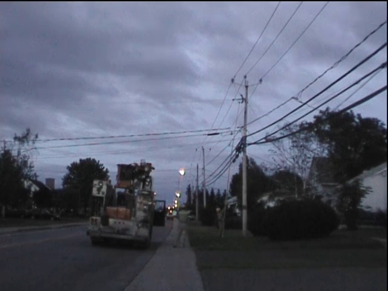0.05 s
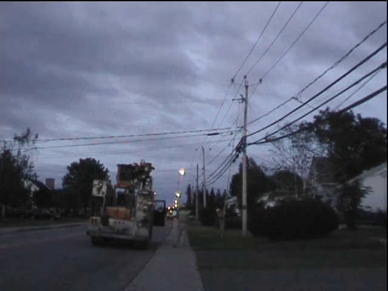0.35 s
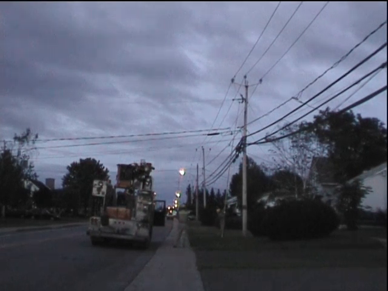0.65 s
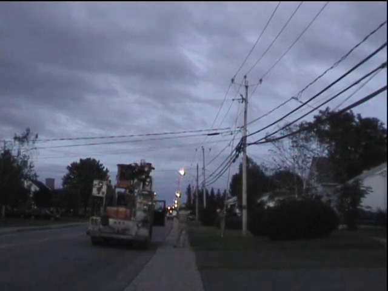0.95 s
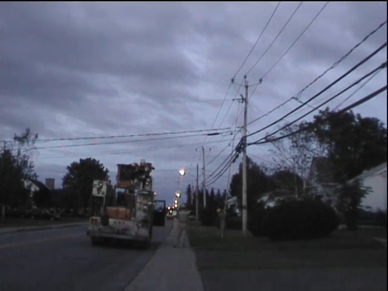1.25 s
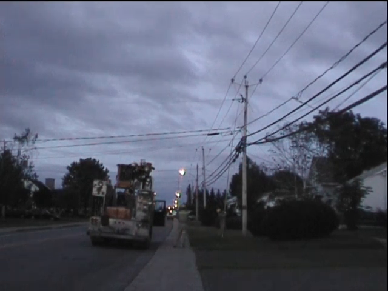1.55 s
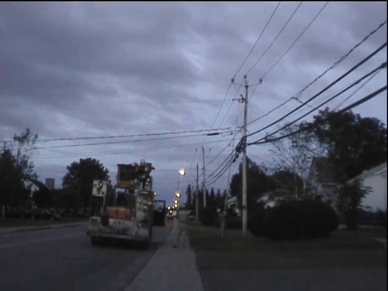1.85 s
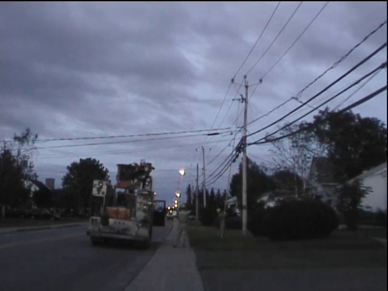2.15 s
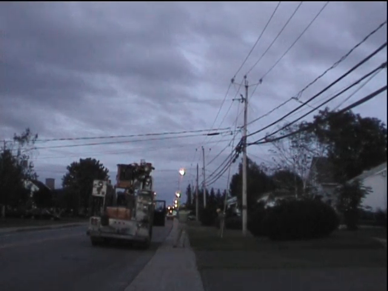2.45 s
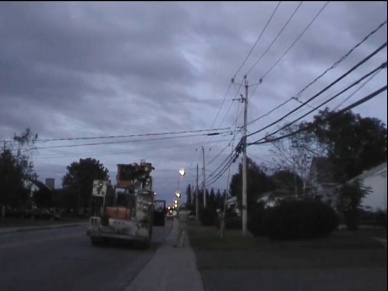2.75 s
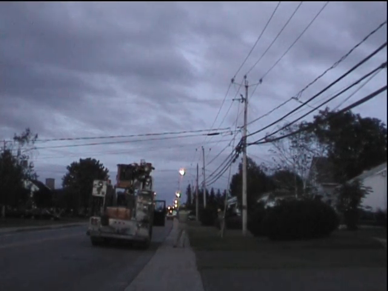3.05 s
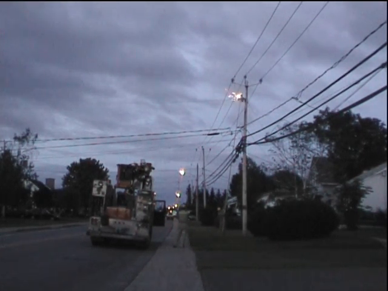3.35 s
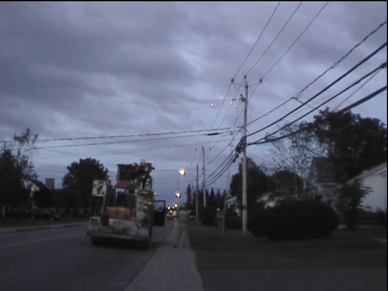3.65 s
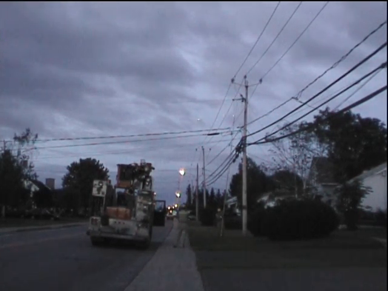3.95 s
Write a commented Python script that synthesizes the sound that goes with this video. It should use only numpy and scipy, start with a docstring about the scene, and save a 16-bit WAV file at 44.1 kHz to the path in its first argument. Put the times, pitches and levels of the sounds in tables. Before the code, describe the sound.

A short circuit on a power pole goes off with a bright crack, then a loud, distorted boom rolling off houses and trees. Before it there is only soft outdoor hush, a thin motor whine, close clicks and distant birds.

```python
"""A loud bang from a short circuit on a utility pole, beside a quiet country road at dusk.
A close, bright crack of snaps, sizzle and ringing comes at the flash. A fifth of a second later the blast
wave, a sudden push of air, overloads the microphone, slaps back from the houses and rolls away through
the trees. Before all this come a few small clicks nearby and far birds, over a thin motor whine,
a low hum and the hush of open air."""
import sys
import numpy as np
from scipy import signal
from scipy.fft import rfft, irfft
from scipy.io import wavfile

SR = 44100
rng = np.random.default_rng(int(sys.argv[2]) if len(sys.argv) > 2 else 0)


def file_out(sig):
    """Save sig as 16-bit WAV at sys.argv[1]."""
    # one column per channel
    cols = np.atleast_2d(sig).T
    # limit, then scale
    lim = np.clip(cols, -1, 1)
    pcm = np.round(lim * 32767).astype(np.int16)
    wavfile.write(sys.argv[1], SR, pcm)


N = 176400  # 4 seconds
T = np.arange(N) / SR
HZ = np.maximum(np.fft.rfftfreq(N, 1 / SR), 1)
CUTOFF_HZ = 15900  # the highest pitches fade out above this

# how alike echoing sound is in the two ears: (frequency [Hz], likeness [0 to 1])
ECHO_LIKENESS = [(150, 0.98), (380, 0.96), (950, 0.84), (6000, 0.69), (15000, 0.17)]


def blast():
    """A sharp push of air and a longer, weaker pull arrive first directly, then again as echoes."""
    # the blast wave and its echoes:
    # (time [s], strength [dB], pulse length [s], treble edge [Hz], scatter [dB], left over right [dB])
    arrivals = [(3.5184, 9.5, .0012, 1150, -7.5, 1), (3.5325, 0, .0012, 350, -14, 4),
                (3.543, 2.5, .00027, 1800, -9.5, 1), (3.5451, 4.5, .00032, 2100, -13, 1),
                (3.5984, 1, .00025, 1900, -22, -2), (3.5995, -1, .0012, 700, -17, -5),
                (3.605, -1, .0013, 400, -32, -3), (3.616, -9, .0034, 220, -44, -3),
                (3.652, -9, .002, 200, -36, 1), (3.7005, -3, .0013, 190, -39, .5),
                (3.8285, -10, .0004, 1300, -32, 0), (3.976, -14, .0006, 400, -27, -1)]
    # tone of the sound that rough walls scatter after each arrival: (frequency [Hz], level [dB])
    scatter_tone = [(150, 8.5), (430, -4), (650, -6), (900, 8), (1500, 3.5), (2200, -1), (2900, -5),
                    (4200, -16.5), (8000, -23), (15000, -46)]
    # how alike that scatter is in the two ears: (frequency [Hz], likeness [0 to 1])
    scatter_likeness = [(200, 0.98), (500, 0.8), (1000, 0.72), (6000, 0.45)]
    s = 2j * np.pi * HZ  # multiplying a spectrum by exp(-s * t) delays the sound by t seconds
    pulses, scatter = 0, 0
    for start, db, length, edge_hz, scatter_db, pan_db in arrivals:
        shock = -s / (s + 1 / length) ** 2 * SR
        u = 1j * HZ / edge_hz
        treble_loss = 1 / (1 + np.sqrt(2) * u + u * u)
        pulses += pan(pan_db) * from_db(db) * shock * treble_loss * np.exp(-s * start)
        scatter += pan(pan_db) * from_db(scatter_db) * burst(start, fade=.0035, attack=.00031)
    bounce_lag_s, bounce_db, right_lag_s = .00232, -8.5, .0001
    road_bounce = 1 + from_db(bounce_db) * np.exp(-s * bounce_lag_s)
    mic_bass_hz, mic_resonance = 86, 1.6
    u = 1j * HZ / mic_bass_hz
    microphone = u * u / (1 + u / mic_resonance + u * u)  # loses the deepest bass
    ear_delay = np.exp(-s * right_lag_s * [[0], [1]])
    bangs = irfft(pulses * road_bounce * microphone * ear_delay, N)
    return bangs + scatter * noise(scatter_tone, scatter_likeness, grain_db=3)


def close_crack():
    """A close, bright crack of snaps, sizzle and ringing comes at the flash, before the blast arrives."""
    # the crack's quick spurts:
    # (time [s], snap [dB], sizzle [dB], rise [s], fade [s], whistle [Hz], whistle [dB])
    spurts = [(3.3275, -12, -30, .0001, 0.00052, 14500, -24),
              (3.3292, -21.5, -30, 0.00017, 0.0037, 11500, -29),
              (3.3349, -36, -21, .0002, 0.0035, 5100, -18.5),
              (3.3393, -32, -11.5, 0.00072, .0036, 7000, -14)]
    # tones of the snap, the sizzle and the fading tail: (frequency [Hz], level [dB])
    snap_tone = [(100, -18), (300, -15), (600, 7.5), (1400, -11), (3000, 3), (5000, -8), (8000, -6),
                 (15000, -6.5)]
    sizzle_tone = [(500, -22), (1500, -9.5), (3000, -8), (5200, -8), (6200, -15), (9000, -13.5),
                   (11000, -15), (13000, -5.5), (15500, -31)]
    tail_tone = [(150, -7), (550, 3), (1200, 3.5), (3000, 4), (5000, 0), (6200, -5), (7000, 2), (7600, -1),
                 (12000, -7), (15500, -23)]
    # pitches at which the sizzle rings: (frequency [Hz], width [Hz], boost [dB])
    sizzle_peaks = [(3770, 180, 12), (6930, 210, 17), (7880, 180, 10), (8970, 340, 13)]
    direct_likeness = [(100, 1.0), (15000, .96)]  # almost the same in both ears
    snap = noise(snap_tone, direct_likeness, grain_db=3.5)
    sizzle = noise(sizzle_tone, direct_likeness, grain_db=3.5, peaks=sizzle_peaks)
    crack, whistle_wander_hz, tail_start_s = 0, 280, 3.341
    for start, snap_db, sizzle_db, rise, fade, hz, whistle_db in spurts:
        whistle = tone(hz + whistle_wander_hz * drift(rate_hz=489.5))
        spurt = from_db(snap_db) * snap + from_db(sizzle_db) * sizzle + from_db(whistle_db) * whistle
        crack += burst(start, fade, rise) * spurt
    short_tail = from_db(-31.5) * burst(tail_start_s, fade=.025, attack=.0032)
    long_tail = from_db(-42) * burst(tail_start_s, fade=.19, attack=.014)
    return pan(-1) * (crack + (short_tail + long_tail) * noise(tail_tone, ECHO_LIKENESS, grain_db=2))


def landscape_echoes():
    """Countless small echoes of the blast roll on over a rumble and swell where trees answer."""
    # tones of the long roll, its deep rumble and the echo off leaves: (frequency [Hz], level [dB])
    roll_tone = [(100, -29), (170, -17), (205, 6), (265, -4), (350, -5.5), (430, 2.5), (540, -5.5),
                 (700, 0.5), (900, 0), (1200, -5), (1700, -3.5), (2900, -6), (4200, -15.5), (6500, -25.5),
                 (9000, -36.5), (14000, -81)]
    rumble_tone = [(20, -30), (35, -4), (52, 9), (80, 9.5), (110, 11.5), (150, 13), (175, 5.5), (205, 5),
                   (260, -20), (600, -50), (3000, -100)]
    leaf_tone = [(300, 5), (800, 5.5), (1300, 4), (3000, 3.5), (5000, -6), (8000, -15), (12000, -28),
                 (15000, -46)]
    # soft echoes from groups of trees: (time [s], half width [s], level [dB], treble edge [Hz])
    tree_echoes = [(3.62, 0.017, -29, 4500), (3.675, 0.014, -29.5, 5000), (3.787, 0.022, -28.5, 11000),
                   (3.825, 0.044, -29.5, 5030), (3.978, 0.0085, -28.5, 1200)]
    start_s = 3.521
    roll = burst(start_s, fade=.54, attack=.00089) * noise(roll_tone, ECHO_LIKENESS, grain_db=5.5)
    rumble = burst(start_s, fade=.5, attack=.0087) * noise(rumble_tone, ECHO_LIKENESS)
    leaves = noise(leaf_tone, ECHO_LIKENESS, grain_db=6.5)
    trees = 0
    for centre, width, db, edge_hz in tree_echoes:
        swell = np.exp(-((T - centre) / width) ** 2 / 2)
        trees += dull(from_db(db) * swell * leaves, edge_hz)
    return pan(-.9) * (from_db(-24) * roll + from_db(-23) * rumble + trees)


def clicks():
    """Small, dry clicks close by, each a clack with a short ring, and one lone bright tick."""
    # the clicks: (time [s], clack [dB], ring [dB], clack fade [s], treble edge [Hz])
    touches = [(0.5252, -33.5, -44, .0042, 6000), (.5345, -45, -54, .006, 9000),
               (.632, -43, -60, .006, 2000), (.8307, -43, -54, .005, 4500), (.8385, -40, -45, .017, 3400),
               (.8672, -35, -39, .009, 7000), (3.4929, -24, -42, .0045, 5000)]
    # the notes that each click rings with: (frequency [Hz], level [dB], fade [s])
    ring_notes = [(1520, -2, .016), (2350, -5, .004), (2630, 0, .009), (3890, -1, .008), (6920, -6, .008)]
    # tones of the clack and the tick: (frequency [Hz], level [dB])
    clack_tone = [(300, -20), (900, -3), (1600, -2), (2600, 0.5), (3900, -2.5), (5200, -5), (7000, -9),
                  (15000, -21)]
    tick_tone = [(2500, -22), (5000, -5), (7000, 2), (10000, -7), (15000, -22)]
    out, clack_noise = 0, noise(clack_tone, ECHO_LIKENESS)
    for start, clack_db, ring_db, clack_fade, edge_hz in touches:
        clack = burst(start, clack_fade, attack=.00077) * clack_noise
        ring = sum(from_db(db) * burst(start, fade, attack=.00059) * np.sin(2 * np.pi * hz * (T - start))
                   for hz, db, fade in ring_notes)
        out += dull(from_db(clack_db) * clack + from_db(ring_db) * ring, edge_hz)
    tick = burst(start=2.8, fade=.0046, attack=.00055) * noise(tick_tone, ECHO_LIKENESS)
    return out + from_db(-42.5) * tick


def birds():
    """Far birds whistle notes that glide through three pitches, over faint chatter; trees blur both."""
    # the notes: (time [s], length [s], start pitch [Hz], middle pitch [Hz], end pitch [Hz], level [dB])
    notes = [(.16, .09, 4000, 3600, 3500, -58), (1.205, .06, 4600, 4450, 3800, -55.5),
             (1.23, .09, 4000, 3650, 3650, -60), (1.29, .13, 3200, 2400, 1750, -60),
             (1.585, .2, 4550, 4030, 3720, -57), (1.73, .27, 3830, 3490, 3220, -53.5),
             (1.675, .13, 2950, 2400, 2780, -54.5), (2.065, .03, 3600, 4700, 5350, -57),
             (2.098, .027, 5000, 4150, 3800, -55.5), (2.773, .08, 5680, 5520, 5370, -56.5),
             (2.878, .08, 5620, 5440, 5370, -56.5)]
    song, waver = 0, 1 + .0042 * drift(rate_hz=77)
    for start, length, start_hz, middle_hz, end_hz, db in notes:
        progress = np.clip((T - start) / length, 0, 1)
        glide = np.polyfit([0, .5, 1], [start_hz, middle_hz, end_hz], 2)
        song += from_db(db) * np.sin(np.pi * progress) * tone(np.polyval(glide, progress) * waver)
    chatter_hz = 3200 * 2 ** (.27 * drift(rate_hz=16))
    song += from_db(-66 + 3 * drift(rate_hz=16)) * tone(chatter_hz)
    reflections = rms_one(rng.standard_normal((2, N)) * burst(0, fade=.02, attack=.005))
    echo = irfft(rfft(song) * rfft(reflections) / np.sqrt(N), N)
    return song + from_db(-4) * echo


def motor_whine():
    """The strongest tones of a small motor make a thin, steady whine."""
    # the tones: (frequency [Hz], level [dB])
    whine_tones = [(1199, -72.5), (1498, -76), (2997, -70.5), (4496, -71)]
    return np.sqrt(2) * sum(from_db(db) * np.sin(2 * np.pi * hz * T) for hz, db in whine_tones)


def motor_buzz():
    """The small motor, close by, also buzzes with high overtones: multiples of its base pitch."""
    # outline of the overtones' strength: (frequency [Hz], level [dB])
    buzz_tone = [(4500, -40), (6500, -8), (8400, 14), (11500, -29), (12900, 11), (15700, -25)]
    base_hz, uneven_db = 299.7, 2.5
    overtones = np.searchsorted(HZ, np.arange(base_hz, CUTOFF_HZ, base_hz))
    unevenness, phase = rng.standard_normal((2, len(HZ)))[:, :len(overtones)]
    strength = from_db(over_hz(buzz_tone)[overtones] + uneven_db * unevenness)
    spectrum = np.zeros(len(HZ), complex)
    spectrum[overtones] = strength * np.exp(2j * np.pi * phase)
    return from_db(-70) * rms_one(irfft(spectrum, N))


def hum():
    """A low hum whose tones each waver a little in loudness and pitch."""
    # the tones: (frequency [Hz], level [dB])
    hum_tones = [(59.6, -66), (178.5, -72), (238.5, -62), (299.5, -66.5), (359.5, -69)]
    out, waver_db, wander_hz = 0, 3.5, 1.155
    for hz, db in hum_tones:
        loudness = from_db(db + waver_db * drift(rate_hz=3.7))
        out += loudness * tone(hz + wander_hz * drift(rate_hz=2.95))
    return np.sqrt(2) * out


def open_air():
    """The soft, steady hush of the outdoors, strongest in the bass."""
    # tone of the hush: (frequency [Hz], level [dB])
    air_tone = [(12, -56), (20, -20), (59, 0.5), (112, 1), (232, -3.5), (298, -8), (324, -6.5), (362, -14),
                (393, -8.5), (705, -9), (1270, -17), (3350, -14), (6190, -23), (8640, -25.5),
                (12800, -30.5), (15500, -33)]
    # how alike it is in the two ears: (frequency [Hz], likeness [0 to 1])
    air_likeness = [(60, 1), (150, 0.72), (380, 0.63), (950, 0.48), (2400, 0.8), (6000, 0.29),
                    (15000, 0.056)]
    return from_db(-48) * noise(air_tone, air_likeness)


def from_db(db):
    """Turn decibels into a number to multiply a sound by."""
    return 10 ** (np.asarray(db) / 20)


def rms_one(x):
    """Scale a signal so that its average size (root mean square) is 1."""
    return x / np.sqrt(np.mean(x ** 2) + 1e-20)


def pan(db):
    """Left and right volumes, with the left this many decibels above the right."""
    return from_db(np.array([[db], [-db]]) / 2)


def over_hz(points):
    """Join (frequency, value) points with straight lines, giving every octave the same room."""
    hz, value = np.transpose(points)
    return np.interp(np.log(HZ), np.log(hz), value)


def drift(rate_hz):
    """A smooth random wobble of about size 1; a higher rate wobbles faster."""
    return rms_one(irfft(rfft(rng.standard_normal(N)) / (1 + (HZ / rate_hz) ** 2) ** 2, N))


def tone(hz):
    """A pure tone that follows a changing pitch."""
    return np.sin(2 * np.pi * np.cumsum(hz) / SR)


def noise(spectrum, likeness, grain_db=0, peaks=()):
    """Stereo noise of size 1 with a given tone and ringing peaks; grain makes it crackly."""
    common, opposite = rfft(rng.standard_normal((2, N)) * from_db(grain_db * rng.standard_normal(N)))
    alike, gain = np.clip(over_hz(likeness), 0, 1), from_db(over_hz(spectrum))
    for hz, width, db in peaks:
        gain *= 1 + (from_db(db) - 1) / (1 + (2 * (HZ - hz) / width) ** 2)
    stereo = np.sqrt(1 + alike) * common + np.sqrt(1 - alike) * opposite * [[1], [-1]]
    return rms_one(irfft(gain * stereo, N))


def burst(start, fade, attack):
    """A loudness curve that rises quickly and then dies away; all times are in seconds."""
    age = np.maximum(T - start, 0)
    return (1 - np.exp(-age / attack)) * np.exp(-np.minimum(age / fade, 60))


def dull(x, edge_hz):
    """Soften the treble above an edge frequency."""
    return signal.sosfilt(signal.butter(2, edge_hz, fs=SR, output="sos"), x + 1e-18)


def scene():
    """Everything that reaches the microphone."""
    background = pan(-2.5) * (hum() + motor_whine() + open_air()) + motor_buzz()
    return background + birds() + clicks() + close_crack() + blast() + landscape_echoes()


def record(dry):
    """The blast overloads the microphone, which flattens its peaks; the highest treble is then cut."""
    clipped = np.clip(dry, -.99, .99)
    treble_cut = signal.cheby2(14, 70, CUTOFF_HZ + 700, fs=SR, output="sos")
    return signal.sosfilt(treble_cut, clipped)


dry = scene()
out = record(dry)
file_out(out)
```